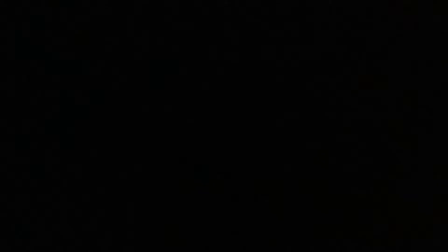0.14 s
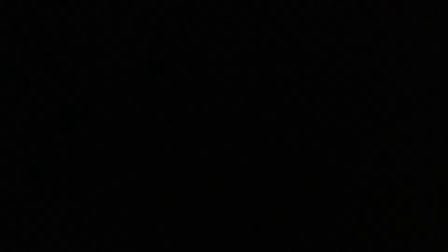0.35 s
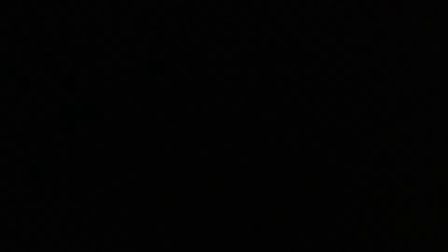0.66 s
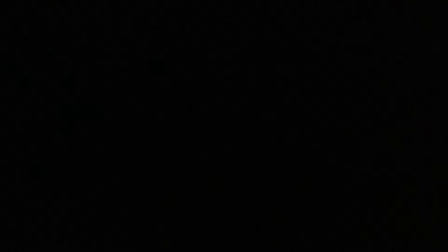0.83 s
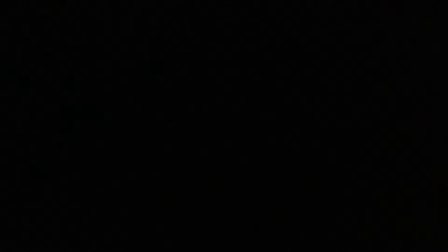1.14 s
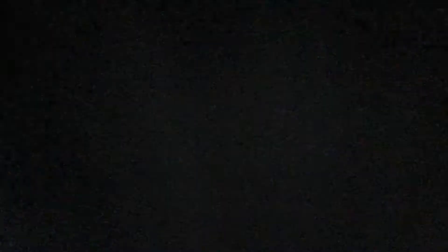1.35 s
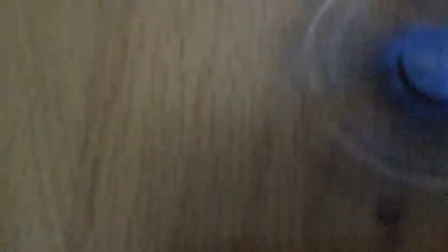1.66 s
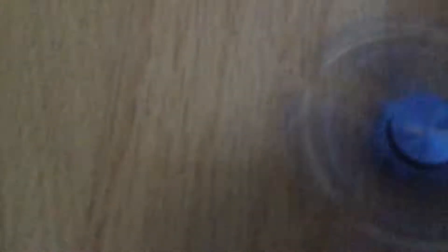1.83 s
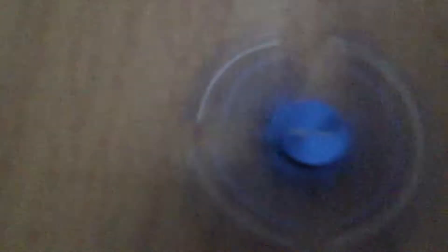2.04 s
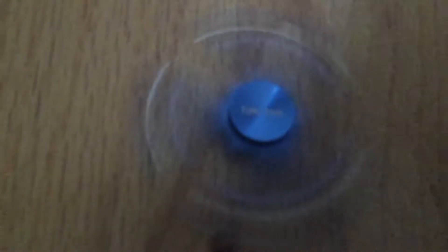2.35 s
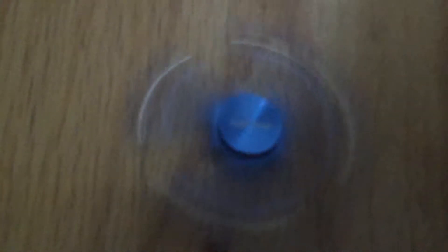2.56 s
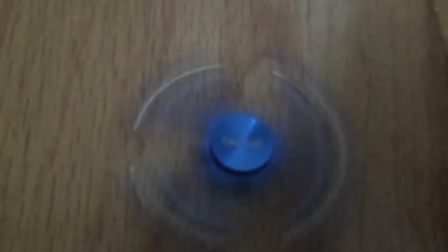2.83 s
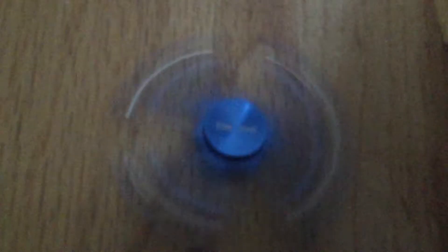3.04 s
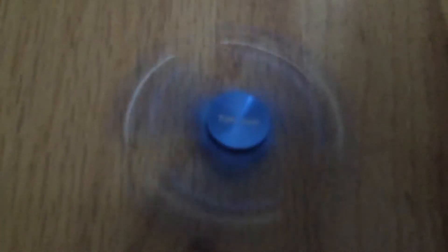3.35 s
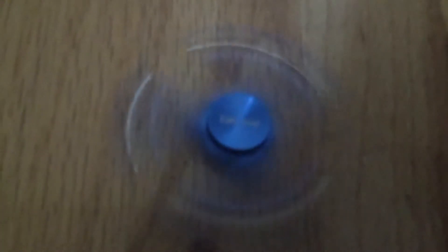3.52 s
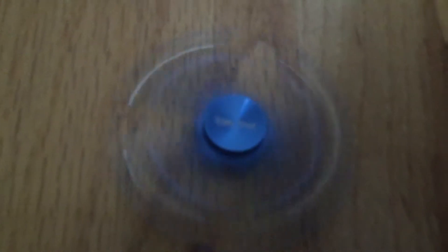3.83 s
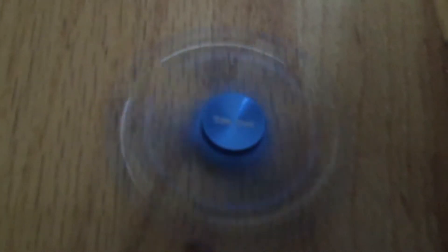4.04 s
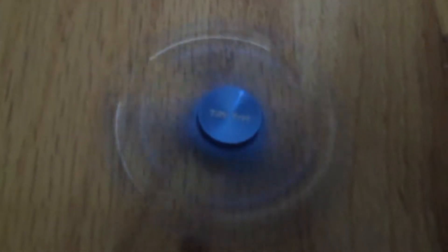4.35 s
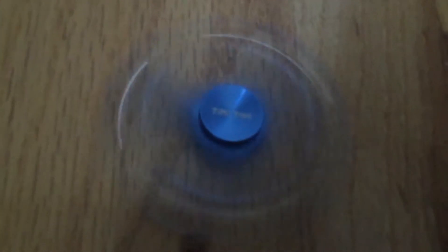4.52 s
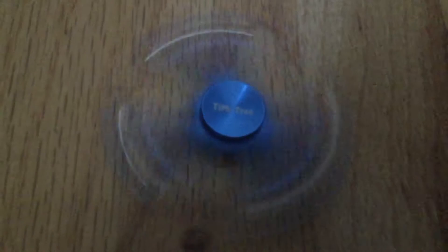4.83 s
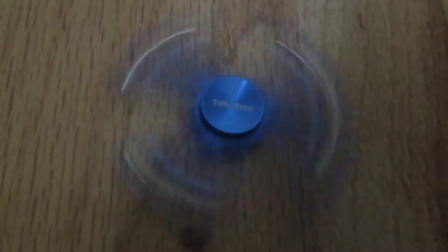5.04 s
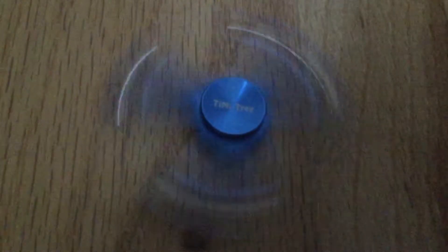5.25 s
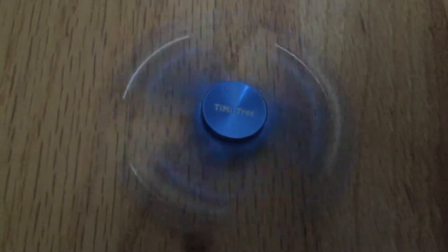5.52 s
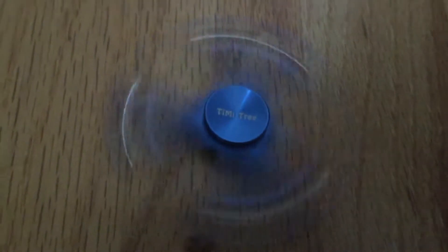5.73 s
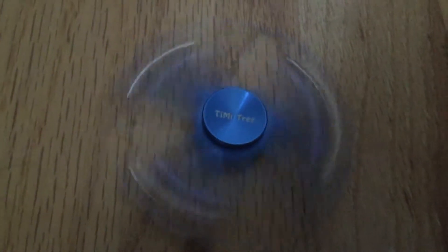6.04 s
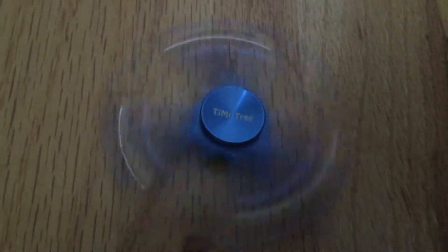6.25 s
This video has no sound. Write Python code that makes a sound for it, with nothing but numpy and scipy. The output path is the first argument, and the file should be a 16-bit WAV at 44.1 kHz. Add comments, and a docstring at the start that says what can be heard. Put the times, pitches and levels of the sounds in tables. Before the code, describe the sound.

Very close to a small, bass-light microphone in a quiet room, fingers handle a metal spinner on a wooden table: faint taps, then dry clicks, dragging rumble, low thuds and gritty skin swishes. A dense burst of metallic knocks follows as it is let go, then a steady soft bearing whir with irregular small ticks, slowly weakening.

```python
"""A metal spinner on a wooden table, close to a small microphone: pushed about, set down and flicked.
It then whirs on its ball bearing, as shaped noise, and rocks: each rock knocks the table, ticks the metal
arms, which ring at a high close pair of modes, and makes the table top boom for a moment.
The hand adds sliding noise, skin swishes, dry clicks and sliding thuds; a faint room noise lies below."""
import sys
import numpy as np
from scipy import signal
from scipy.io import wavfile
from scipy.ndimage import uniform_filter1d

SR = 44100
rng = np.random.default_rng(int(sys.argv[2]) if len(sys.argv) > 2 else 0)


def master(y):
    """Save y as 16-bit WAV."""
    cut = np.clip(np.atleast_2d(y).T, -1, 1)
    pcm = np.round(cut * 32767)  # scale
    wavfile.write(sys.argv[1], SR, pcm.astype(np.int16))


def volts(x):
    """Linear amplitude factor 10**(x/20) for a level x in dB, scalar or array-like."""
    e = np.asarray(x, float) / 20
    return 10 ** e


N = 281358  # length in samples


def evened(x):
    """Scales to rms 1."""
    return x / np.sqrt(np.mean(x ** 2) + 1e-20)


def band(x, low_hz, high_hz):
    """Steep band-pass."""
    return signal.sosfilt(signal.butter(3, [low_hz, high_hz], "band", fs=SR, output="sos"), x)


def add(mix, s, sound):
    """Mixes a sound in at a time in seconds."""
    part = mix[round(s * SR):][:len(sound)]
    part += sound[:len(part)]


def curve(rows, column):
    """Gain over time from a dB column, silent outside the table."""
    rows = np.array(rows)
    return volts(np.interp(np.arange(N) / SR, rows[:, 0], rows[:, column], -150, -150))


def coloured(points, peaks=(), patchy_db=4.5, size=512):
    """Noise of a given spectrum and rms 1, with resonant humps and drifting patches."""
    grid = (4 * N // size + 5, size // 2 + 1)  # frames, frequencies
    hz = np.fft.rfftfreq(size, 1 / SR)
    f, db = np.transpose(points)
    shape = np.interp(np.log(hz + 1), np.log(f + 1), db)
    for mid, width, top_db in peaks:
        shape = shape + top_db / (1 + (2 * (hz - mid) / width) ** 2)
    patches = uniform_filter1d(rng.standard_normal(grid), size=12, axis=0)
    patches = evened(uniform_filter1d(patches, size=6, axis=1))
    z = rng.standard_normal(grid) + 1j * rng.standard_normal(grid)
    z = z * volts(shape + patchy_db * patches)
    noise = signal.istft(z.T, nperseg=size, noverlap=3 * size // 4)[1]
    return evened(noise[:N])


def resonate(x, hz, width):
    """One fixed resonance of gain 1."""
    pole = np.exp((2j * hz - width) * np.pi / SR)
    return 2 * signal.lfilter([1 - abs(pole)], [1, -pole], x).real


def resonate_twice(x, hz, width):
    """The same resonance passed twice, for steeper sides."""
    return resonate(resonate(x, hz, width), hz, width)


def train(s, gain):
    """Impulses of the given sizes at the given times."""
    return np.bincount(np.clip(np.round(s * SR).astype(int), 0, N - 1), gain, N)


def strike(blows, modes):
    """Rings dying modes with a train of blows."""
    t = np.arange(round(1.5 * SR * max(mode[2] for mode in modes))) / SR
    ring = sum(volts(db - 60 * t / t60) * np.sin(2 * np.pi * hz * t) for hz, db, t60 in modes)
    return signal.oaconvolve(blows, ring / abs(ring).max())[:N]


def smear(blows, length, decay_s):
    """Turns each blow into a decay to 1/e in decay_s, cut at length samples."""
    return signal.oaconvolve(blows, np.exp(-np.arange(length) / SR / decay_s))[:N]


def thud(hz, rise):
    """Bending waves in a board arrive high first: a soft blow that slides down in pitch."""
    t = np.arange(round(12 * rise * SR)) / SR
    turns = hz * (t + 1.8 * .0015 * (1 - np.exp(-t / .0015)))
    return t / rise * np.exp(1 - t / rise) * np.sin(2 * np.pi * turns)


# Modes of the cap against the table. Each row: frequency in Hz, relative level in dB, t60 in s.
CAP_MODES = [(708, -10, 0.015), (1100, -7, 0.007), (1400, 2, 0.018), (1940, -1, 0.0094),
             (2500, -1.5, 0.0018)]


def ring_cap(blows, shorten):
    """Rings all the cap's modes together, dying faster by the given factor."""
    return strike(blows, [(hz, db, t60 / shorten) for hz, db, t60 in CAP_MODES])


def specks(per_s, spread_db):
    """Small blows at random times, of very uneven size."""
    size = volts(spread_db * np.minimum(rng.exponential(1, N), 3))
    return size * (rng.random(N) < per_s / SR)


# Resonances of the table top. Each row: frequency in Hz, width in Hz, relative level in dB.
TABLE_TOP = [(164.2, 7.6, 20), (216.3, 59, 22.5), (298.5, 40, 19.5), (628, 235, 14.5)]


def boom(s, boom_db, swell):
    """The table top keeps being shaken for a moment after a blow, most strongly swell seconds later."""
    t = np.arange(SR // 5) / SR
    shaking = signal.oaconvolve(train(s, volts(boom_db)), t / swell * np.exp(1 - t / swell))[:N]
    noise = band(rng.standard_normal(N), 177.4, 530)
    steady = sum(volts(db) * resonate(noise, hz, width) for hz, width, db in TABLE_TOP)
    shaken = sum(volts(db) * resonate(noise * shaking, hz, width) for hz, width, db in TABLE_TOP)
    return shaken / np.std(steady)


# Spectrum of the quiet room. Each row: frequency in Hz, relative level in dB per Hz.
ROOM_TONE = [(100, -22), (330, 6.5), (4730, -16.5), (6760, -20.5), (9070, -23), (15000, -31)]


def room():
    """Faint steady noise of the quiet room, with little patchiness."""
    return volts(-64) * coloured(ROOM_TONE, patchy_db=1.2)


# The spinner's cap tapping the table as it is pushed about. Each row: time in seconds, boom level in dB.
CAP_TAPS = [(0.001, -43), (0.048, -42.5), (0.168, -43.5), (0.201, -41)]


def taps():
    """The cap's light taps shake the table top softly."""
    return boom(*np.transpose(CAP_TAPS), 0.009)


# Spinner clattering in the fingers. Each row: time in seconds, level in dB, pitch in Hz.
CLICKS = [(0.0438, -35, 840), (0.1604, -33.5, 925), (0.207, -37, 2950), (0.511, -20, 1150),
          (0.526, -22, 1550), (0.531, -18.5, 1170), (0.564, -24, 2680), (0.637, -22.5, 1600),
          (0.687, -29, 1400), (0.712, -33, 1100), (0.732, -32.5, 1240), (0.76, -27.5, 1100),
          (0.8045, -36, 1300), (0.836, -27, 1290), (0.882, -28, 1300), (0.915, -18, 1180),
          (0.946, -16, 1550), (0.966, -22, 1110), (0.99, -29, 1120), (1.048, -31.5, 1400),
          (1.079, -30, 1750), (1.093, -25.5, 1170), (1.1244, -29, 1730), (1.2296, -24.5, 1660),
          (1.244, -23, 920), (1.305, -18, 2770), (1.445, -37, 2500)]
REBOUND_S, REBOUND_DB = .005, -8.5  # each click lands twice


def clatter():
    """Dry clicks: a quick sliding blip, a gritty puff around it, a small push on the board."""
    out, t = np.zeros(N), np.arange(1300) / SR
    for s, db, hz in CLICKS:
        grit = rng.standard_normal(len(t))
        puff = resonate(resonate(grit, hz, 0.49 * hz), hz, 0.5 * hz)
        puff = evened(puff) * np.exp(-t / 0.0022)
        add(out, s, volts(db - 6) * thud(hz, .0005))
        add(out, s, volts(db + 2.5) * puff)
        add(out, s + REBOUND_S, volts(db + REBOUND_DB + 2 * grit[1]) * puff)
        add(out, s + 0.0015, volts(db - 6.5) * thud(330 + 60 * grit[0], 0.0039))
    return band(band(out, 120, 3100), 60, 4000)


# Hand dragging over the table. Each row: time in seconds, rumble level in dB.
DRAG = [(.198, -67), (.206, -41.5), (.3, -62), (.478, -86), (.484, -32), (.6, -27.5), (.66, -40.5),
        (.88, -38.5), (.905, -33), (1.001, -36), (1.04, -37.5), (1.4, -27.5), (1.44, -43), (1.51, -66),
        (1.54, -44.5), (1.66, -38.5), (1.8, -93)]
# Spectrum of that rumble. Each row: frequency in Hz, relative level in dB per Hz.
DRAG_TONE = [(35, -80), (60, -31), (97, -62), (198, 20), (321, 9.5), (642, 1.5), (1390, -16), (4580, -21),
             (6000, -37.5), (9000, -73)]


def sliding():
    """Low lumpy rumble of a hand sliding on wood, with small crackles."""
    lumps = volts(2 * evened(uniform_filter1d(rng.standard_normal(N), size=500)))
    rumble = evened(lumps * coloured(DRAG_TONE, patchy_db=1.5))
    crackle = evened(band(ring_cap(specks(600, 5.5), 3), 580, 2370))
    return curve(DRAG, column=1) * (rumble + volts(-9) * crackle)


# The rim grinds as it is grabbed: start in seconds, end in seconds, level in dB, pitch in Hz, width in Hz.
RIM_GRAB = (.4805, .506, -26, 1280, 750)


def grab():
    """One short grind: noise through a broad resonance."""
    out = np.zeros(N)
    start, end, db, hz, width = RIM_GRAB
    grind = resonate_twice(rng.standard_normal(round((end - start) * SR)), hz, width)
    add(out, start, volts(db) * evened(band(grind, 500, 3300)) * signal.windows.tukey(len(grind), .15))
    return out


# Spectrum of skin on metal. Each row: frequency in Hz, relative level in dB per Hz.
SKIN_TONE = [(900, -42), (1240, 9.5), (1580, 6.5), (2980, 9), (4380, -1.5), (7980, -3.5), (15800, -28)]
# Fingers swishing off the metal. Each row: start, peak and end in seconds, peak level of the swish in dB,
# extra treble in dB, shape (1 = pointed top, 3 = flat with a sudden stop).
FINGER_FLICKS = [(0.558, 0.576, 0.64, -29, 7, 1.3), (0.496, 0.647, 0.79, -49, -24, 1.7),
                 (1.115, 1.178, 1.293, -37.5, -7, 1.3), (1.195, 1.287, 1.317, -28, -19, 1.27),
                 (1.281, 1.33, 1.33, -32, 3, 1.8), (1.31, 1.389, 1.425, -22, -7, 2.9),
                 (1.398, 1.447, 1.63, -48, -19, 1.23), (1.45, 1.62, 1.9, -51, -19, 1.3)]
FLICK_ENDS_DB = -50.5  # level at both ends under the peak


def flicks():
    """Each gritty swish of skin rises to its peak and falls away by one rule; some are brighter."""
    grit = 1 + 5.7 * uniform_filter1d(rng.exponential(1, N) ** 2, size=90)
    swish = evened(grit * coloured(SKIN_TONE, patchy_db=.3))
    treble = band(swish[::-1], 6800, 16000)  # reversed, so that it moves apart from the swish
    t, out = np.arange(N) / SR, np.zeros(N)
    for start, peak, end, db, treble_db, flat in FINGER_FLICKS:
        away = np.interp(t, [start, peak, end], [1, 0, 1])
        level = volts(db + FLICK_ENDS_DB * away ** flat) * (away < 1)
        out += level * (swish + volts(treble_db) * treble)
    return out


# Bumps of the hand on the table. Each row: time in seconds, level in dB, final pitch in Hz,
# time to the peak in seconds.
HAND_BUMPS = [(.534, -14, 240, .005), (.546, -11, 140, .005), (.559, -6, 200, .0028),
              (.570, -11, 260, .002), (1.1745, -10, 195, .0033), (1.3112, -5.5, 260, .0015),
              (1.3578, -5.5, 260, .0014)]


def bumps():
    """Low thuds of the hand, each sliding down to its final pitch."""
    out = np.zeros(N)
    for s, db, hz, rise in HAND_BUMPS:
        add(out, s, volts(db) * thud(hz, rise))
    return out


# Dry cracks of nail or cap edge. Each row: time in seconds, peak level in dB, pitch in Hz.
CRACKS = [(0.772, -38, 6750), (1.1325, -34, 6000), (1.1362, -36, 8950), (1.171, -27, 3500),
          (1.1741, -12, 2660), (1.468, -36, 8850), (1.8764, -20.5, 1890), (1.881, -22, 4320)]


def snaps():
    """One or two cycles each, no ring."""
    out = np.zeros(N)
    for s, db, hz in CRACKS:
        turns = np.arange(-40, 40) / SR * hz
        add(out, s - 40 / SR, volts(db) * np.exp(-(turns / .6) ** 2) * np.cos(2 * np.pi * turns))
    return out


# Fingernail and loose parts ticking the metal. Each row: time in seconds, level in dB.
METAL_TICKS = [(0.8969, -31.5), (0.9054, -35), (0.9218, -33), (0.9373, -30), (0.967, -34), (0.9782, -27),
               (1.0844, -39), (1.532, -42), (1.5445, -33), (1.553, -39), (1.559, -30), (1.591, -37),
               (1.599, -37), (1.6105, -30), (1.628, -31), (1.638, -35), (1.6714, -50), (1.68, -56)]
# Modes of a metal tick. Each row: frequency in Hz, relative level in dB, t60 in s.
TICK_MODES = [(3880, -10, 0.017), (4670, 13, 0.003), (5085, 0.5, 0.014), (6070, 6.5, 0.003),
              (7850, -6, 0.00065)]
# Modes that sing under a fingertip. Each row: frequency in Hz, relative level in dB, t60 in s.
HELD_MODES = [(3560, -9, 0.09), (4975, -2, 0.12), (5020, -1, 0.1), (5400, -9, 0.13)]
# Long ring of the arms. Each row: frequency in Hz, relative level in dB, t60 in s.
ARM_MODES = [(9134, 0, .22), (9155, -1, .2), (14900, -17, .1)]
FREED_S, FREED_DB = 1.5, -9  # once let go, each tick also rings the lowest held mode


def jingle():
    """Light ticks ring the metal's short modes, its held modes and the first mode of the arms."""
    s, db = np.transpose(METAL_TICKS)
    arm_hz, _, arm_t60 = ARM_MODES[0]
    ticks = strike(train(s, volts(db)), TICK_MODES + HELD_MODES + [(arm_hz, -10, arm_t60)])
    ticks += strike(train(s, (s > FREED_S) * volts(db + FREED_DB)), HELD_MODES[:1])
    return band(band(ticks, 1500, 8000), 1500, 9500)


# Soft low thumps: the first is the hand's weight bumping the table, the later ones knock the microphone's case.
# Each row: time in seconds, level in dB, width in seconds.
LOW_THUMPS = [(1.175, -11.5, 0.0019), (1.88, -47, 0.0094), (4.754, -40, 0.0024)]


def thumps():
    """Pitchless low pushes: one swing down and up."""
    t = np.arange(N) / SR
    return sum(volts(db) * np.exp(-((t - s) / width) ** 2) * (t - s) / width for s, db, width in LOW_THUMPS)


# Strength of the whir. Each row: time in seconds, level in dB.
WHIR_LEVEL = [(1.4, -47), (2.04, -50.5), (6.38, -56)]
# Spectrum of the rolling balls. Each row: frequency in Hz, relative level in dB per Hz.
ROLLING_TONE = [(80, -33), (200, 5), (420, 8.5), (650, 4.5), (710, -45), (1150, -4.5), (1390, -5),
                (2160, -14.5), (2930, -24), (4050, -8.5), (8500, -29), (11500, -84)]
# Body resonances sung by the whir. Each row: frequency in Hz, width in Hz, height in dB.
BODY_PEAKS = [(408, 26, 4.5), (497, 18, 9.5), (597.5, 22, 7.5), (1440, 19, 8), (2924, 750, 20.5),
              (4000, 200, 3.5)]
# A mode the balls keep singing only at first: frequency in Hz, level over the whir in dB, gone by in s.
FIRST_SINGING = 5380, -19, 2.9


def bearing():
    """Rolling balls hiss through the body, rattle and keep the arms faintly singing."""
    rolling = coloured(ROLLING_TONE, BODY_PEAKS, patchy_db=1.2, size=2048)
    noise = rng.standard_normal(N)
    singing = evened(sum(volts(db) * resonate_twice(noise, hz, 45) for hz, db, _ in ARM_MODES))
    hz, db, gone = FIRST_SINGING
    fade = np.clip(gone - np.arange(N) / SR, 0, 1) ** .5  # over the last second
    early = volts(db) * evened(resonate_twice(noise, hz, 70)) * fade
    rattle = evened(band(ring_cap(specks(200, 7.5), 2), 700, 4000))
    return curve(WHIR_LEVEL, column=1) * (rolling + early + volts(-22) * singing + volts(-10.5) * rattle)


def cap_knocks(s, knock_db):
    """Every mode gets its own share of each blow, so no two knocks have one colour."""
    out = np.zeros(N)
    graze_db = knock_db - 36.5 - 14 * rng.random(len(s))
    for hz, db, t60 in CAP_MODES:
        share, lag, echo = rng.random((len(s), 3)).T
        side = rng.integers(0, 3, len(s))
        # each mode rings at one of three tunings a little apart, drawn afresh for every knock
        for k, tune in enumerate((.92, 1, 1.08)):
            on = side == k
            graze = train(s - .005, on * volts(graze_db))
            first = train(s + 0.00086 * lag, on * volts(knock_db - 15 - 6.8 * share))
            second = train(s + 0.00303 + 0.0058 * lag, on * volts(knock_db - 17.5 - 33.0 * echo))
            out += volts(db) * strike(graze + first - second, [(tune * hz, db, t60)])
    return band(out, 440, 14000)


SCUFF_S = 0.0011  # decay: each tick is a short gritty scuff, not a point blow
BOUNCE_DB, BOUNCE_S = -23, .007  # weaker ticks scatter after the first


def ticks(tick_s, tick_db):
    """Metal ticks: gritty scuffs ring short high modes, with a weaker bounce."""
    out, grit = np.zeros(N), rng.standard_normal(N)
    echo, weak = rng.random((2, len(tick_s)))
    bounce = train(tick_s + .003 + BOUNCE_S * echo ** 2, volts(tick_db + BOUNCE_DB - 6 * weak))
    for mode in TICK_MODES:
        blows = train(tick_s, volts(tick_db - 14.5 - 6.4 * rng.random(len(tick_s)))) + bounce
        scuff = smear(blows, 400, SCUFF_S) * grit
        out += volts(mode[1]) * strike(scuff / np.sqrt(SCUFF_S * SR / 2), [mode])
    return band(out, 3200, 9800)


def arm_ring(tick_s, ring_db):
    """The turning arms share each blow unevenly between their modes."""
    out = np.zeros(N)
    for mode in ARM_MODES:
        share = rng.choice([-1, 1], len(tick_s)) * rng.uniform(0.043, 1, len(tick_s))
        out += volts(mode[1]) * strike(train(tick_s, volts(ring_db) * share), [mode])
    return band(out, 8500, 14300)


def ball_chatter(s, knock_db):
    """The loose balls chatter briefly after the blow, amid a puff of hiss."""
    chatter = ring_cap(rng.standard_normal(N) * (rng.random(N) < 500 / SR), 2)
    jolt = smear(train(s + 0.00234, volts(knock_db - 32.0)), SR // 5, 0.011)
    return band(jolt * (coloured(SKIN_TONE) + volts(4.5) * evened(chatter)), 420, 7000)


# Spinner rocking on its cap. Each row: time in seconds, then levels in dB of knock, table boom
# and metal tick, before each mode takes its share.
ROCKS = [(1.417, -19, -55, -26.5), (1.5253, -8.5, -47, -23), (1.5483, -12, -46, -25.5),
         (1.5582, -11, -53, -27), (1.5678, -10.5, -40, -26), (1.584, -11, -49, -20.5),
         (1.6104, -5, -55, -24), (1.6237, -10, -38, -21), (1.6582, -15, -42, -30),
         (1.672, -12.5, -42.5, -24), (1.725, -16, -40, -36), (1.7587, -18.5, -42, -38),
         (1.7796, -28, -48, -41), (1.876, -12.5, -40.5, -24), (1.923, -17.5, -42, -29.5),
         (1.9452, -22.5, -68, -52), (2.0327, -19, -42.5, -27.5), (2.0915, -22, -50, -35),
         (2.159, -24, -42.5, -34), (2.28, -23.5, -47, -39), (2.307, -18.5, -42.5, -35.5),
         (2.351, -22, -52, -41), (2.405, -25, -54, -39.5), (2.4933, -21.5, -41, -43),
         (2.694, -18.5, -45, -42), (2.792, -24, -48, -37), (2.886, -17, -45, -36),
         (2.937, -27.5, -46.5, -44), (3.0186, -14, -38, -30), (3.046, -24.5, -69, -40),
         (3.0625, -18, -44, -35), (3.121, -21, -48.5, -40), (3.185, -21, -45.5, -33.5),
         (3.196, -23, -48, -33.5), (3.2585, -28, -71, -44), (3.4546, -20.5, -45.5, -35.5),
         (3.568, -22, -45.5, -38.5), (3.7109, -20.5, -41.5, -36), (3.784, -20, -49, -39.5),
         (3.817, -16.5, -54, -34), (3.8529, -15, -35, -30), (3.893, -24, -56, -38),
         (3.968, -24, -55, -38.5), (3.9919, -21.5, -43.5, -32.5), (4.0177, -23.5, -44.5, -73),
         (4.081, -23.5, -49, -40), (4.2478, -18.5, -41, -36), (4.299, -18, -48, -45),
         (4.4762, -23, -37.5, -36), (4.504, -19, -86, -35), (4.721, -17.5, -44, -32),
         (4.7767, -26.5, -48, -32), (4.8056, -16.5, -41, -32), (4.8901, -23.5, -47.5, -45),
         (4.937, -22.5, -43, -41), (5.013, -23, -47, -48), (5.0513, -19.5, -47, -36.5),
         (5.0722, -22, -43.5, -68), (5.1043, -26.5, -58, -40), (5.181, -17, -40.5, -33),
         (5.2296, -16.5, -41.5, -31), (5.3029, -19, -43, -47), (5.353, -22, -50, -72),
         (5.514, -26, -46, -41), (5.5661, -28, -52, -42), (5.614, -21.5, -47, -39), (5.8233, -30, -56, -47),
         (5.9082, -27.5, -41, -38.5), (5.931, -23.5, -59, -74), (6.052, -23.5, -44, -54),
         (6.148, -28, -57, -46), (6.275, -22.5, -52, -50), (6.3593, -26.5, -37.5, -40.5)]
# the arms ring in step with tick and boom: dB at the reference blow, dB per dB of tick and of boom
RING_DB, RING_PER_TICK, RING_PER_BOOM = -51.5, 1, 0.39
REFERENCE_TICK_DB, REFERENCE_BOOM_DB = -36, -44


def knocks():
    """Each rock is a short chatter: a graze, the cap knock, a metal tick just after, a late swelling boom."""
    s, knock_db, boom_db, tick_db = np.transpose(ROCKS)
    ring_db = RING_DB + RING_PER_TICK * (tick_db - REFERENCE_TICK_DB)
    ring_db = ring_db + RING_PER_BOOM * (boom_db - REFERENCE_BOOM_DB)
    tick_s = s + .005 + .002 * rng.random(len(s))  # the tick follows the knock
    metal = ticks(tick_s, tick_db) + arm_ring(tick_s, ring_db)
    return cap_knocks(s, knock_db) + metal + boom(s, boom_db, 0.013) + ball_chatter(s, knock_db)


def scene():
    """Spinner and hand over the quiet room."""
    handling = taps() + clatter() + sliding() + grab() + flicks() + bumps() + snaps() + jingle()
    return (room() + handling + thumps() + bearing() + knocks())[None]


def roll_off(x):
    """The treble ends steeply here."""
    return signal.sosfilt(signal.butter(12, 16030, fs=SR, output="sos"), x)


def record(dry):
    """A small microphone that drops the deep bass."""
    thin = signal.sosfilt(signal.butter(2, 100, "high", fs=SR, output="sos"), dry)
    return roll_off(thin)


dry = scene()
out = record(dry)
master(out)
```